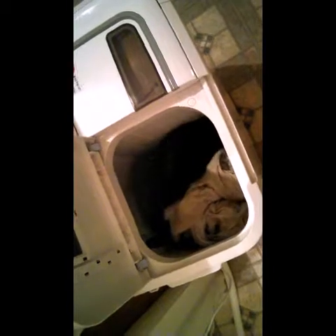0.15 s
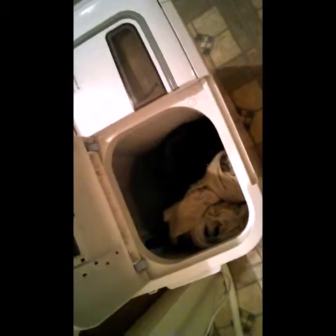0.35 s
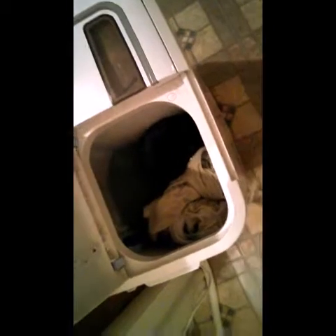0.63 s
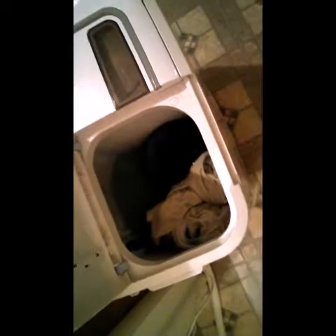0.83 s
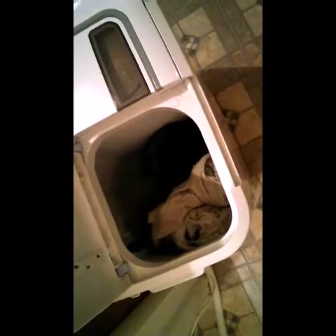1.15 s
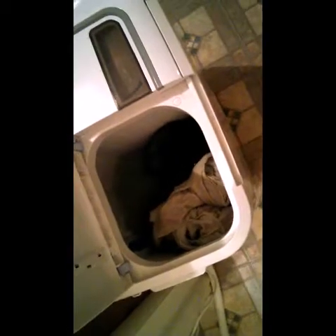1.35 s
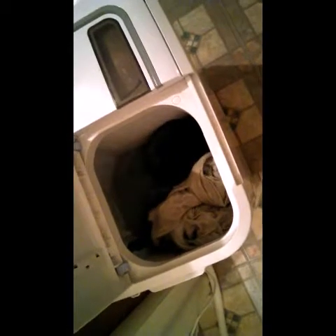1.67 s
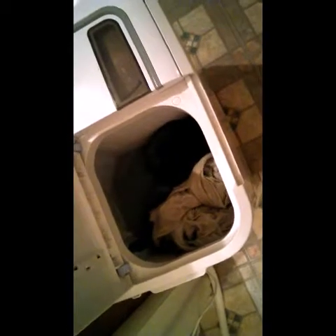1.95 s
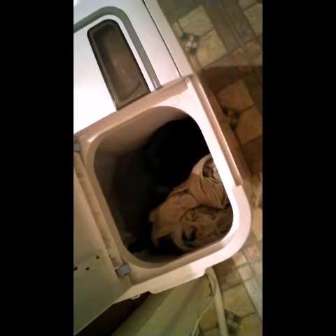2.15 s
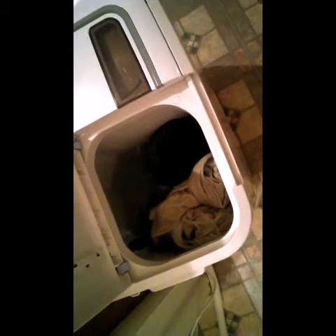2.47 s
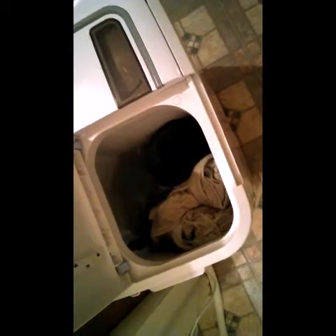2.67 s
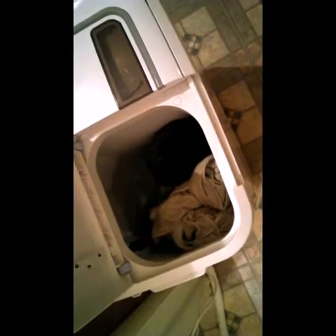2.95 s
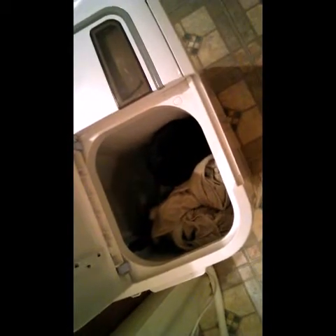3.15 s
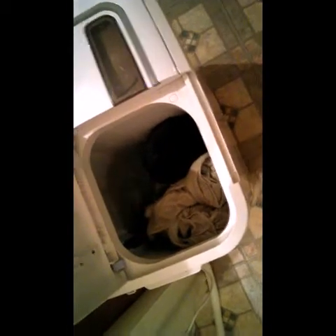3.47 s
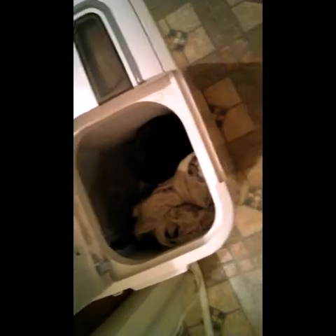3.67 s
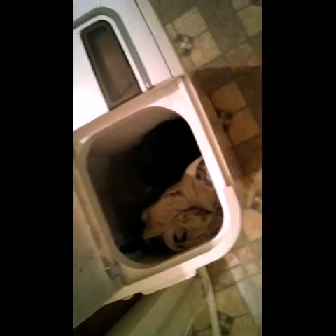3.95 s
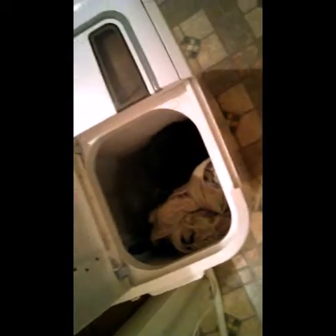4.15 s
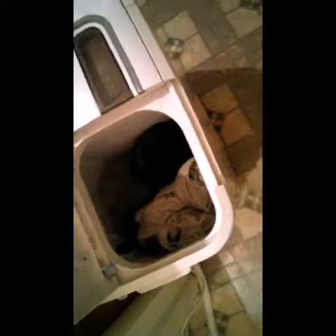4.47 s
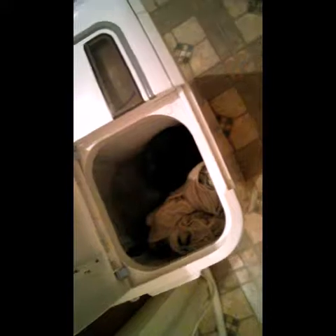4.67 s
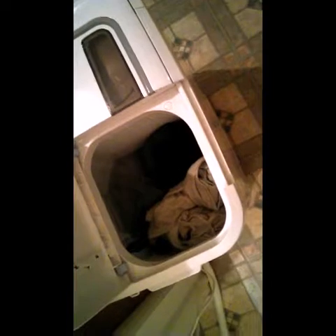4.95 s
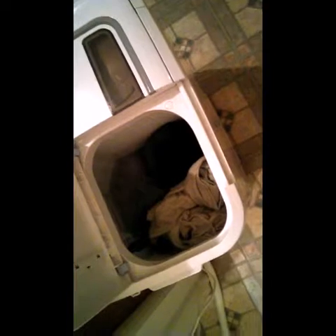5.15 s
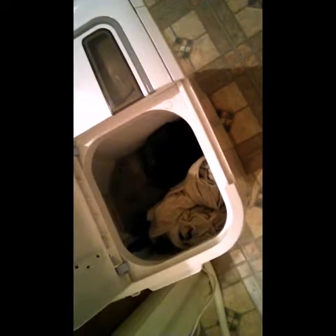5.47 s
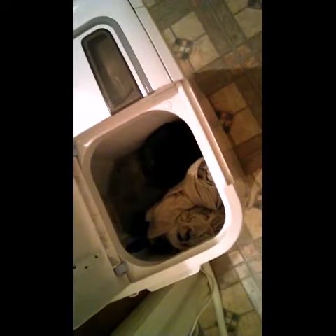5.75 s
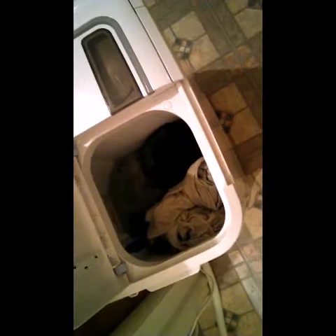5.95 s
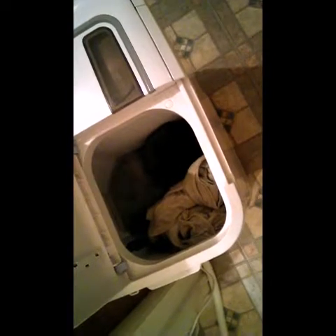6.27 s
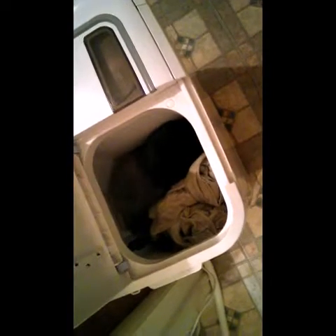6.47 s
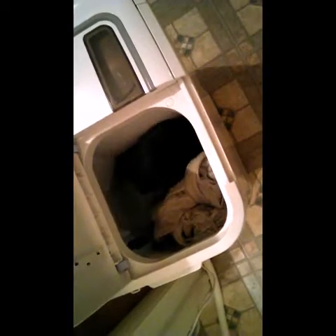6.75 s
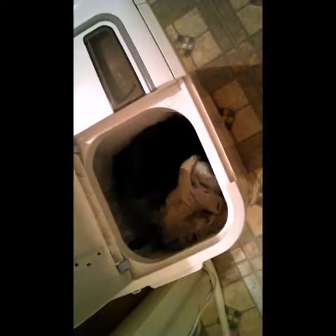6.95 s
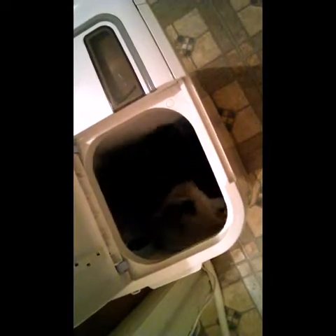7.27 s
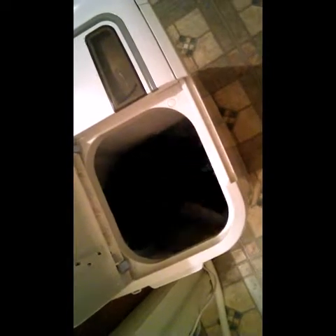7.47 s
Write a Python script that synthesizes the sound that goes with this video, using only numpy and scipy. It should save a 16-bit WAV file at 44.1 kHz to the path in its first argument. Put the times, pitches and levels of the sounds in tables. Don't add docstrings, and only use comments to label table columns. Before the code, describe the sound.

Close stereo pickup of a washing machine. Rumbling motor and swishing water come first, with short runs of hollow bubble pops toward the left. A hard click cuts the motor; only a steady dry buzzing rattle remains. Then a relay clack, a faint groan and rising rumble bring the wash back, ending in dense splashes, crackly spray and pinging droplets against the tub.

```python
import sys
import numpy as np
from scipy import signal
from scipy.fft import rfft, irfft, next_fast_len
from scipy.io import wavfile

SR = 44100
rng = np.random.default_rng(int(sys.argv[2]) if len(sys.argv) > 2 else 0)


def level_to_linear(level):
    exponent = np.asarray(level, float) / 20
    return 10 ** exponent


def transcribe(u):
    v = np.clip(np.atleast_2d(u).T, -1, 1)
    q = np.round(v * 32767).astype(np.int16)
    wavfile.write(sys.argv[1], SR, q)


N = 336042

TIME = np.arange(N) / SR
SIZE = next_fast_len(N + SR // 2)
HZ = np.maximum(np.arange(SIZE // 2 + 1) * SR / SIZE, 1)


def rms_one(x):
    return x / np.sqrt(np.mean(x ** 2) + 1e-20)


def in_time(rows):
    s, *columns = np.transpose(rows)
    return [np.interp(TIME, s, c) for c in columns]


def at_hz(points, hz=HZ):
    table_hz, values = np.transpose(points)
    return np.interp(np.log(hz), np.log(table_hz), values)


def drift(rate):
    r = np.exp(-80 * np.pi * rate / SR)
    draws = rng.standard_normal(N // 40 + 2002)
    slow = signal.lfilter([1], [1, -2 * r, r * r], draws)[2000:]
    return np.interp(np.arange(N) / 40, np.arange(len(slow)), rms_one(slow))


def noise():
    return rng.standard_normal((2, N))


def grains(per_s, spread_db, most=5):
    size = level_to_linear(spread_db * np.minimum(rng.exponential(1, N), most))
    return (rng.random(N) < per_s / SR) * size * noise()


def peaks(modes):
    return 1 + sum(level_to_linear(db) / (1 + 1j * (HZ ** 2 - hz ** 2) / (HZ * width)) for hz, width, db in modes)


def add(out, s, piece):
    i = int(s * SR)
    out[..., i:i + piece.shape[-1]] += piece[..., :N - i]


def swells(rows, length):
    return sum(db * np.exp(-((TIME - s - length / 2) / length) ** 2) for s, db in rows)


def burst(length, t60, rise=.001):
    t = np.arange(int(.25 * SR)) / SR
    return np.minimum(t / rise, 1) * level_to_linear(-60 * np.maximum(t - length, 0) / max(t60, .005))


def bubble(hz, cycles, rise):
    t = np.arange(int(.1 * SR)) / SR
    swell_s = min((1 + cycles / 20) / hz, .001)
    envelope = np.minimum(t / swell_s, 1) * level_to_linear(-60 * t * hz / cycles)
    return envelope * np.sin(2 * np.pi * hz * t * (1 + rise * t * hz / cycles))


def whistle(length, first_hz, last_hz):
    part = np.arange(int(length * SR)) / (length * SR)
    mean_hz = first_hz + (last_hz - first_hz) * part / 2
    return np.sin(np.pi * part) * np.sin(2 * np.pi * length * part * mean_hz)


def droplets(per_s, low_hz, high_hz, cycles):
    clicks = grains(per_s, 2.2, most=3)
    dealt = rng.integers(0, 16, N)
    out = 0
    for k, hz in enumerate(np.geomspace(low_hz, high_hz, 16)):
        r, w = level_to_linear(-60 * hz / (cycles * SR)), 2 * np.pi * hz / SR
        struck = clicks * (dealt == k) + 1e-18
        gain = np.sin(w) * np.sqrt(1 - r)
        out = out + signal.lfilter([0, gain], [1, -2 * r * np.cos(w), r * r], struck)
    return rms_one(out)


def patchy(x, edges_hz, db, rate):
    out = 0
    for low, high in zip(edges_hz, edges_hz[1:]):
        band = signal.sosfilt(signal.butter(1, [low, high], "band", fs=SR, output="sos"), x)
        out = out + band * level_to_linear(db * drift(rate))
    return rms_one(out)


def in_tub(x, t60, wet_db):
    t = np.arange(int(.12 * SR)) / SR
    tails = rng.standard_normal((2, len(t))) * level_to_linear(-60 * t / t60)
    tails = level_to_linear(wet_db) * tails / np.sqrt(np.sum(tails ** 2, axis=1, keepdims=True))
    return x * np.array([[1], [0]]) + signal.fftconvolve(x[None], tails, axes=1)[:, :N]


# (frequency [Hz], likeness [0-1])
PORT_LIKENESS = [(30, 0.97), (130, 1), (290, 0.96), (640, 0.8), (1000, 0.4), (1410, 0.04), (15000, 0.01)]
# (frequency [Hz], level [dB])
PORT_BALANCE = [(60, -3.5), (150, -1.5), (380, -1), (950, -1.5), (2380, -6.5), (5980, -4), (15000, -3.5)]


def ports(pair, response, pan_db, twin=0., unlike=0.):
    left_lag_s = .00016
    shared, differing = rfft(pair, SIZE) * response
    differing = np.sqrt(1 - min(twin, 1) ** 2) * differing - 1j * twin * shared
    alike = np.clip(at_hz(PORT_LIKENESS) - unlike, 0, 1)
    pan = level_to_linear((at_hz(PORT_BALANCE) + pan_db * (1 - alike)) / 2)
    shared, differing = shared * np.sqrt(1 + alike), differing * np.sqrt(1 - alike)
    left = (shared + differing) * pan * np.exp(-2j * np.pi * HZ * left_lag_s)
    right = (shared - differing) / pan
    return irfft([left, right], SIZE)[:, :N]


# (frequency [Hz], density [dB per Hz])
KITCHEN_TILT = [(15, -41), (25, -21), (66, 2), (129, -11.5), (289, -20), (349, -2), (523, -21), (614, -9),
                (848, -22), (1240, -19.5), (3000, -21.5), (8500, -25.5), (12200, -34), (15500, -36)]
# (frequency [Hz], width [Hz], level [dB])
PUMP_SONG_BANDS = [(594, 8.9, 8.5), (688, 9.2, 10), (793, 6.6, -3), (856, 14, 8)]


def kitchen():
    response = level_to_linear(at_hz(KITCHEN_TILT)) * peaks(PUMP_SONG_BANDS)
    return level_to_linear(-55.5) * rms_one(ports(noise(), response, pan_db=3.5, unlike=0.12))


# (time [s], level [dB])
HUM_LEVEL = [(0.0, -87), (0.66, -41), (0.8, -57), (1.48, -45), (2.42, -58), (2.84, -45), (3.14, -46),
             (3.48, -59.5), (4.48, -53.5), (6.3, -61.5), (6.56, -58), (6.83, -55), (7.07, -52),
             (7.36, -48.5), (7.62, -75)]
# (frequency [Hz], level [dB rms])
HUM_NEIGHBOURS = [(86.1, -66.5), (118.4, -75.5), (172.3, -71), (430.7, -69)]


def hum():
    hum_hz, sag_hz = 59.1, 2.8
    load = np.clip((in_time(MOTOR_EFFORT)[0] + 55) / 15, 0, 1)
    phase = 2 * np.pi * np.cumsum(hum_hz - sag_hz * load) / SR + 0.22 * drift(3.3)
    tone = level_to_linear(in_time(HUM_LEVEL)[0] + 5.5) * np.sin(phase)
    for hz, db in HUM_NEIGHBOURS:
        level = level_to_linear(db + 3.0 + 3.4 * drift(1))
        tone = tone + level * np.sin(2 * np.pi * hz * TIME + 1.23 * drift(0.98))
    return tone * level_to_linear(at_hz(PORT_BALANCE, hum_hz) / 2 * np.array([[1], [-1]]))


def windings():
    slack_db = np.minimum(in_time(MOTOR_EFFORT)[0] - FULL_EFFORT_DB, 0)
    level_db = -42.5 + slack_db + 1.8 * drift(4.0)
    buzz = np.sin(2 * np.pi * 120.2 * TIME + 0.42 * drift(3.6))
    return level_to_linear(level_db) * buzz * level_to_linear([[-.9], [.9]])


# (time [s], turns counted)
SHAFT_TURNS = [(0.0, 0.14), (0.6, 10.34), (1.2, 20.15), (1.8, 29.81), (2.8, 46.35), (3.2, 53.17),
               (3.4, 56.49), (3.6, 59.88), (4.2, 70.22), (4.8, 80.64), (5.4, 90.87), (5.6, 94.17),
               (5.8, 97.35), (6.0, 100.67), (6.2, 104.13), (7.6, 127.68)]
# (time [s], level [dB])
RATTLE_LEVEL = [(0, -50), (1.5, -52.5), (3.1, -51.5), (3.4, -51), (4.2, -50), (5, -50.5), (5.9, -51),
                (6.3, -51.5), (7.62, -48)]
# (place [turn], level [dB], length [s], t60 [s], brightness [dB])
CONTACTS = [
    (.89, 1, 0.013, 0.026, -1),
    (.37, -2.5, 0.0095, 0.034, -2),
]
# (frequency [Hz], density [dB per Hz])
RATTLE_TILT = [(200, -54), (330, -1), (520, -3), (700, -5.5), (900, -6), (1250, -15.5), (1700, -12),
               (3500, -14.5), (4900, -17.5), (6500, -22.5), (14000, -39.5)]
# (frequency [Hz], width [Hz], level [dB])
HOUSING_MODES = [(356, 26, 2), (605, 21, 12), (624, 25, 7.5), (693, 20, 5), (780, 11, 7), (830, 35, 6.5),
                 (1070, 40, 3.5), (2973, 47, 15.5), (3590, 100, 9),
                 (1560, 73, 5), (1830, 13.5, 11.5), (2252, 115, 6), (2630, 61, 4), (3277, 64, 11.5),
                        (4040, 73, 5.5), (4320, 130, -1), (5070, 45, 3), (5470, 54, -3)]


def pump():
    fresh_bass, fresh_hz = 0.28, 1300.
    s, turns = np.transpose(SHAFT_TURNS)
    count = np.arange(-1, turns[-1])
    response = level_to_linear(at_hz(RATTLE_TILT)) * peaks(HOUSING_MODES)
    bass = signal.butter(1, fresh_hz, fs=SR, output="sos")
    out = 0
    for place, db, length, t60, bright_db in CONTACTS:
        shape = burst(length, t60, rise=.002)
        surface = shape * rng.standard_normal((2, len(shape)))
        gate, repeated = np.zeros(N), np.zeros((2, N))
        meetings = np.interp(count + place, turns, s)
        for at, chance in zip(meetings, rng.standard_normal((len(count), 2))):
            if 0 < at < N / SR - .01:
                at = max(at + .0006 * chance[0], 0)
                gain = level_to_linear(db + 1.0 * chance[1])
                add(gate, at, gain * shape)
                add(repeated, at, gain * surface)
        tilt = level_to_linear(bright_db * np.tanh((HZ - 3100.) / 400))
        fresh = gate * noise()
        fresh = fresh - (1 - fresh_bass) * signal.sosfilt(bass, fresh)
        out = out + ports(fresh + 0.93 * repeated, response * tilt, pan_db=-2.0, twin=0.26)
    return level_to_linear(in_time(RATTLE_LEVEL)[0]) * rms_one(out)


# (time [s], peak [dB], pitch [Hz], ring [cycles])
WALL_TICKS = [(6.6766, -36, 2900, 6), (6.851, -34, 4900, 8), (6.8655, -34, 4400, 25),
              (6.869, -36, 3600, 20), (6.892, -37, 6000, 30), (6.984, -33, 5000, 25),
              (6.9914, -30, 8800, 10), (6.9945, -38, 6700, 25), (7.0573, -29, 3400, 6),
              (7.0635, -29, 4800, 8), (7.092, -30, 2200, 4), (7.1366, -27, 4200, 5),
              (7.2324, -31, 6600, 14), (7.235, -31, 2300, 5), (7.3155, -32, 5500, 5), (7.345, -29, 1500, 7),
              (7.382, -35, 3300, 10), (7.496, -30, 1200, 8), (7.4965, -36, 4000, 10),
              (7.503, -45, 3500, 15), (7.578, -35, 2500, 14), (0.7975, -40, 2600, 8),
              (0.976, -42, 4000, 10), (1.3875, -29, 860, 7.2), (1.0645, -36, 6200, 12),
              (7.1842, -11.5, 6650, 32), (0.5465, -33, 13500, 6), (0.5475, -38, 8000, 6), (9, -26, 1700, 6),
              (6.8, -25, 1200, 6), (7.3565, -26, 1300, 6), (7.1585, -30, 6200, 20), (7.0735, -33, 5200, 8),
              (7.037, -36, 6500, 8), (7.271, -38, 8500, 20), (7.294, -38, 6500, 8), (6.911, -38, 6500, 6),
              (6.965, -35, 4200, 30), (6.3, -36, 1800, 8)]


def ticks():
    out = np.zeros(N)
    for s, db, hz, cycles in WALL_TICKS:
        add(out, s, level_to_linear(db) * bubble(hz, max(cycles, 3), rise=0.05))
    return ports(in_tub(out, t60=.03, wet_db=-13), 1, pan_db=-4.)


# (time [s], peak [dB], pitch [Hz], ring [cycles])
DROP_RINGS = [(2.417, -33.5, 1010, 24), (6.8084, -35, 2160, 22), (7.0574, -32, 1430, 16),
              (7.0944, -32, 1570, 31), (7.1187, -30.5, 2030, 25), (0.3451, -34, 3280, 40),
              (2.4265, -40, 950, 20), (2.337, -40, 1030, 20), (6.814, -35, 3000, 25), (6.89, -38, 4200, 25),
              (6.899, -28, 3500, 25), (7.0735, -28, 4000, 14), (7.079, -25, 3330, 20),
              (7.171, -28, 3900, 20), (7.347, -32, 2290, 25), (7.315, -29, 2760, 19),
              (7.335, -40, 5930, 40), (7.4105, -38, 6960, 50), (7.434, -36, 4200, 30),
              (7.439, -39, 5000, 30), (7.449, -36, 5000, 40), (7.556, -37, 4100, 70),
              (7.563, -30, 2800, 38), (7.6, -46, 5200, 31), (7.3437, -26, 1380, 61),
              (7.3475, -25.5, 1040, 20), (7.362, -38, 1500, 34), (7.5572, -28.5, 1830, 20),
              (7.5714, -27.5, 2250, 19), (0.4604, -31, 6200, 31), (0.4843, -36, 3230, 30),
              (2.9228, -29, 7160, 16), (6.863, -27, 3880, 35), (6.911, -34, 4600, 50),
              (7.1362, -31, 4660, 47), (7.144, -32, 4800, 60), (7.1546, -27, 4870, 32),
              (7.187, -18, 7100, 44), (7.1904, -27, 7450, 50), (7.1953, -47, 2980, 23),
              (7.2863, -26.5, 4030, 41), (7.301, -36, 4200, 30), (7.3535, -30, 3270, 40),
              (7.575, -33, 2540, 34), (7.4091, -38, 6300, 35)]
# (time [s], peak [dB], pitch [Hz], ring [cycles])
CABINET_GROANS = [
    (1.016, -38, 595, 45),
    (6.05, -43, 570, 30),
    (6.078, -43, 530, 30),
    (6.035, -44, 2060, 50),
    (6.07, -46, 1560, 90),
]
# (time [s], length [s], peak [dB], first pitch [Hz], last pitch [Hz])
POCKET_WHISTLES = [
    (1.875, 0.016, -41, 1620, 2380),
    (0.91, 0.011, -54, 1450, 2100),
    (7.158, 0.0172, -32, 1500, 4400),
    (7.144, 0.0093, -29.5, 2160, 1140),
]


def drops():
    out = np.zeros(N)
    for s, db, hz, cycles in DROP_RINGS + CABINET_GROANS:
        add(out, s, level_to_linear(db) * bubble(hz, max(cycles, 3), rise=0.03))
    for s, length, db, first_hz, last_hz in POCKET_WHISTLES:
        add(out, s, level_to_linear(db) * whistle(length, first_hz, last_hz))
    return ports(in_tub(out, t60=.05, wet_db=-6), 1, pan_db=-4.)


# (time [s], peak [dB], pitch [Hz], ring [cycles], tick peak [dB])
AIR_GULPS = [(0.738, -30, 940, 5.5, -56), (0.749, -23, 1100, 4.5, -51), (0.761, -36, 1700, 14, -56),
             (0.773, -42, 1900, 10, -56), (1.064, -28, 1500, 4.7, -42.5), (1.074, -25, 1310, 4.2, -50),
             (1.087, -38, 850, 8, -49), (1.098, -44, 1800, 10, -59), (1.3763, -33, 1220, 10.6, -49),
             (1.389, -37, 1950, 13, -45.5), (1.397, -38, 1790, 12, -58), (1.4075, -47, 1900, 10, -54),
             (1.8614, -19.5, 950, 4.3, -48.5), (1.871, -23, 1340, 7.1, -49), (1.882, -38, 1960, 28, -51),
             (1.894, -38, 2000, 12, -50), (2.208, -19, 1180, 3.6, -47), (2.2187, -35, 1350, 7.3, -49),
             (2.235, -47, 1500, 7, -49.5)]


def gulps():
    pan_db = 27
    out = np.zeros((2, N))
    for s, db, hz, cycles, tick_db in AIR_GULPS:
        pop = level_to_linear(db) * bubble(hz, cycles, rise=0.22)
        pop = pop + level_to_linear(tick_db + 5.0) * bubble(4290.0, 27.0, rise=.01)
        add(out, s, level_to_linear(2.5) * pop * level_to_linear([[pan_db / 2], [-pan_db / 2]]))
    ring = in_tub(out[0], t60=.045, wet_db=-10) - out[0] * np.array([[1], [0]])
    return out + ring


# (time [s], peak [dB], length [s], brightness [dB], sizzle [dB])
SNAP_EVENTS = [(0.547, -32, 0.0024, -6, 18), (3.148, -25, 0.004, 11.5, 4), (3.1516, -14, 0.0091, 5, -1),
               (3.348, -44.5, .004, 10, 8), (3.454, -35.5, 0.004, 11, -19), (3.489, -38, 0.019, 7, 1),
               (4.568, -38.5, 0.0081, 7, -8), (5.958, -26, 0.0079, 9, 0), (6.046, -46.5, 0.028, -9, -11),
               (6.581, -42, 0.0054, 4.5, 18), (6.842, -34.5, 0.099, 4, 6.5), (6.975, -30, 0.01, -0.5, 12),
               (6.991, -33.5, 0.0029, 4.5, 28.5), (7.056, -30.5, 0.002, 14.5, -10),
               (7.063, -32, 0.0022, 15.5, -1), (7.1363, -23, 0.002, 12.5, -16), (7.141, -33, .01, 8, -10),
               (7.153, -23.5, 0.013, 8, -3), (7.113, -33, .003, 13.5, 5), (7.183, -40, .003, 10, 21),
               (7.213, -29.5, .005, -1.5, 22), (7.23, -22.5, 0.0026, 4.5, 11), (7.31, -33, .002, 10, -5),
               (7.481, -33, .003, 9, -16), (7.341, -45, 0.009, -16, -12), (7.554, -47, 0.0051, -18, -14)]
# (frequency [Hz], density [dB per Hz])
SNAP_TILT = [(150, -12), (240, 4), (330, 17.5), (600, 6), (1200, -5), (2500, -5.5), (5000, -8.5),
             (7500, -19), (10000, -15.5), (14000, -29), (16200, -40)]
# (frequency [Hz], width [Hz], level [dB])
BRAKE_MODES = [(2364, 24, 9.5), (6550, 270, 7), (7220, 180, 6)]


def snaps():
    dull, bright, top = np.zeros((3, N))
    for s, db, length, tilt_db, sizzle_db in SNAP_EVENTS:
        t60 = 0.034 + 3.4 * length
        quick = burst(length, 0.46 * t60) + 0.34 * burst(length, 3.7 * t60)
        add(dull, s, level_to_linear(db - 9.0 - tilt_db) * burst(length, t60))
        add(bright, s, level_to_linear(db - 18.0 + tilt_db) * quick)
        add(top, s, level_to_linear(db - 17.5 + tilt_db + sizzle_db) * quick)
    crackle = noise() + 0.24 * rms_one(grains(2500, 9.5))
    crackle = rms_one(ports(crackle, level_to_linear(at_hz(SNAP_TILT)) * peaks(BRAKE_MODES), pan_db=-2.5))
    low = signal.sosfilt(signal.butter(2, 4500., fs=SR, output="sos"), crackle)
    high = signal.sosfilt(signal.butter(4, 8300., "high", fs=SR, output="sos"), crackle)
    middle = signal.sosfilt(signal.butter(4, 8300., fs=SR, output="sos"), crackle - low)
    return dull * low + bright * middle + top * high


# (frequency [Hz], density [dB per Hz])
CHURN_TILT = [(210, -40), (350, -3), (488, -48), (600, -10), (738, -12.5), (1010, -7), (1280, -18.5),
              (2270, -16), (3300, -18.5), (4000, -23.5), (7130, -28.5), (9500, -39.5), (11000, -70),
              (15500, -113.5)]


def churn(churn_db):
    fizz = noise() + 0.26 * droplets(2500, 672.0, 7700.0, cycles=8.7)
    whine = [(1594, 340, 1.5)]   # (Hz, width Hz, dB)
    stirred = ports(fizz, level_to_linear(at_hz(CHURN_TILT)) * peaks(whine), pan_db=1.0)
    return level_to_linear(churn_db + 5.0) * patchy(stirred, np.geomspace(300, 16000, 8), db=1.8, rate=41)


# (frequency [Hz], density [dB per Hz])
SPLASH_TILT = [(600, -26), (1200, -2.5), (2000, -6.5), (4000, -8), (7000, -13), (9500, -13.5), (11500, -49),
               (15500, -75)]


def splash(splash_db):
    hiss = noise() * level_to_linear(2.5 * drift(40))
    heavy = np.clip((splash_db + 66) / 14, .2, 1.9)
    spray = hiss + heavy * droplets(1100 * level_to_linear(3 * drift(25)), 1000, 8000, cycles=24)
    return level_to_linear(splash_db + 8.5) * rms_one(ports(spray, level_to_linear(at_hz(SPLASH_TILT)), pan_db=-5.0))


# (time [s], spray above the mist [dB])
CLOTH_FLOP = [
    (6.2, -6),
    (6.79, 3),
    (6.9, 4),
    (7.0, 8.5),
    (7.06, 11.5),
    (7.17, 10.5),
    (7.24, 11.5),
    (7.3, 10),
    (7.62, 5),
]
# (time [s], peak [dB])
WALL_SPATTERS = [(0.4609, -60), (0.5501, -47), (0.6694, -47), (0.7607, -48), (1.0635, -55), (2.6668, -47),
                 (2.9228, -51)]


def water():
    churn_db, mist_db = -50, -66
    slack_db = np.minimum(in_time(MOTOR_EFFORT)[0] - FULL_EFFORT_DB + 6.0, 0)
    slaps = [(s, 0.61 * (db + 68)) for s, db in WALL_SPATTERS]
    spray_db = in_time(CLOTH_FLOP)[0] + swells(slaps, 0.018)
    stirred_db = 0.75 * slack_db
    return churn(churn_db + stirred_db + 0.04 * spray_db) + splash(mist_db + stirred_db + spray_db)


# (time [s], effort [dB], strain [dB]); strain raises or lowers the small panels' shaking alone
MOTOR_EFFORT = [(0, -30, -9.5), (0.3, -32, -7), (1.0, -32.5, -6.5), (2.4, -33.5, -5), (2.7, -37, -0.5),
                (3.0, -34, -4), (3.13, -33, -4.5), (3.165, -39.5, -1.5), (3.205, -39, 3),
                (3.24, -52.5, -0.5), (3.44, -61.5, 0.5), (5.94, -62.5, 2), (6.04, -49.5, -2),
                (6.28, -40, 2), (6.85, -34.5, -5.5), (6.93, -43, 0), (7.02, -31.5, -11), (7.22, -40.5, 2.5),
                (7.62, -33.5, -1)]
FULL_EFFORT_DB = -36
# (time [s], peak [dB], pitch [Hz])
LOAD_LURCHES = [(0.014, -35, 172), (0.258, -14.5, 151), (0.33, -27, 221), (0.452, -29, 175),
                (0.548, -23.5, 145), (0.739, -20, 172), (0.869, -11, 215), (1.054, -20, 124),
                (1.237, -16, 180), (1.35, -7, 164), (1.547, -24, 172), (1.908, -33.5, 153),
                (2.01, -27, 167), (2.278, -21, 170), (2.369, -12, 151), (2.964, -32, 148),
                (3.059, -11, 148), (6.044, -34, 272), (6.239, -24, 229), (6.471, -8, 164),
                (6.627, -20, 151), (6.759, -31, 186), (6.959, -10, 116), (7.057, -38, 172),
                (7.194, -23, 266), (7.349, -31, 196), (7.487, -15, 237)]
# (frequency [Hz], density [dB per Hz])
RUMBLE_TILT = [(15, -35), (25, 0), (38, 3.5), (50, -4), (80, 9.5), (104, -3.5), (114, 3), (165, -2),
               (263, -8.5), (389, -18), (445, -17.5), (494, -19), (600, -17.5), (657, -21), (900, -62),
               (1170, -41), (1980, -120)]
# (frequency [Hz], width [Hz], level [dB])
CABINET_MODES = [(56, 8.1, 1), (120.3, 7.6, 2.5), (151.4, 15.6, 9.5), (178.3, 8.1, 13), (209.6, 9, -2),
                 (223.5, 33, 1), (254, 36, -1.5), (449.3, 13, 5.5), (603, 19, 3)]


def lurch_swells(small_panels):
    lurches = [(s, min(0.36 * (db + 32.5), 9)) for s, db, hz in LOAD_LURCHES if (hz > 192) == small_panels]
    return swells(lurches, 0.019)


def motor():
    knocks = noise() * level_to_linear(1.03 * drift(32.0)) + 0.37 * rms_one(grains(60, 2.7))
    response = level_to_linear(at_hz(RUMBLE_TILT)) * peaks(CABINET_MODES)
    under_frame, under_large = (1 / np.sqrt(1 + (HZ / hz) ** 10) for hz in (93, 192))
    effort_db, strain_db = in_time(MOTOR_EFFORT)
    rocking_db = 2.5 * drift(0.59)
    frame_db = -48.5 + 0.62 * (effort_db - FULL_EFFORT_DB) + rocking_db
    large_db = effort_db + lurch_swells(False) - 4.0
    small_db = effort_db + strain_db + lurch_swells(True) - .3
    parts = [(frame_db, under_frame), (large_db, under_large - under_frame), (small_db, 1 - under_large)]
    return sum(level_to_linear(db) * rms_one(ports(knocks, response * share, pan_db=-4.0)) for db, share in parts)


def scene():
    machine = hum() + windings() + pump() + snaps() + motor()
    wet = ticks() + drops() + gulps() + water()
    return kitchen() + machine + wet


def low_pass(x):
    return signal.sosfilt(signal.butter(12, 16290, fs=SR, output="sos"), x)


def record(dry):
    cut = signal.sosfilt(signal.cheby2(10, 50, 16400, fs=SR, output="sos"), dry)
    cut = signal.sosfilt(signal.butter(2, 30., "high", fs=SR, output="sos"), cut)
    return low_pass(cut + .0012)


dry = scene()
out = record(dry)
transcribe(out)
```